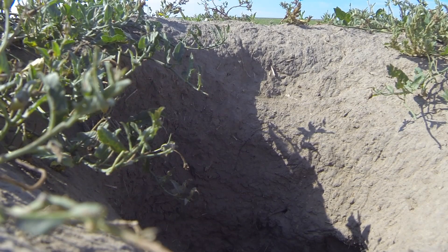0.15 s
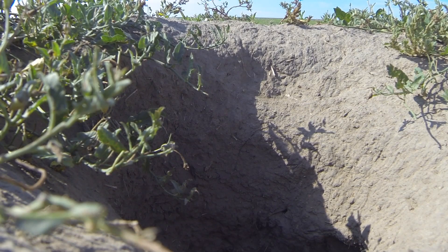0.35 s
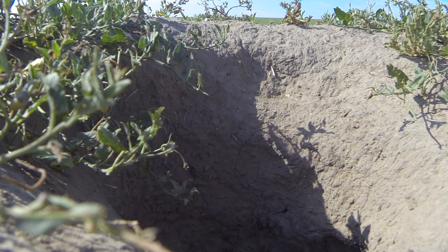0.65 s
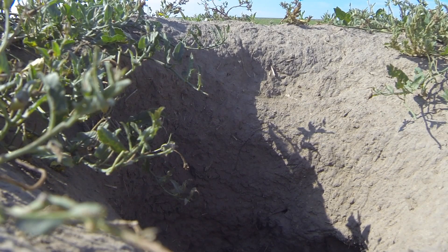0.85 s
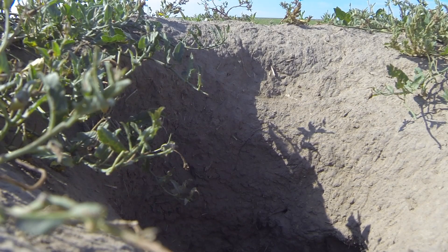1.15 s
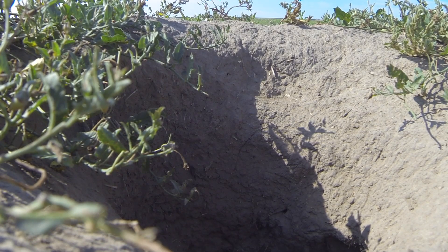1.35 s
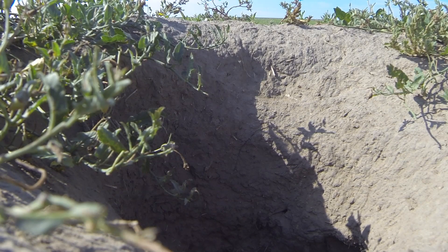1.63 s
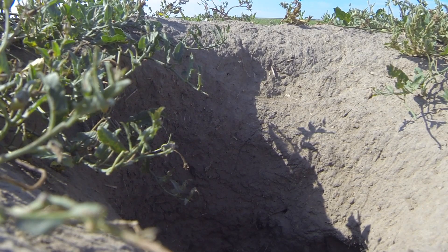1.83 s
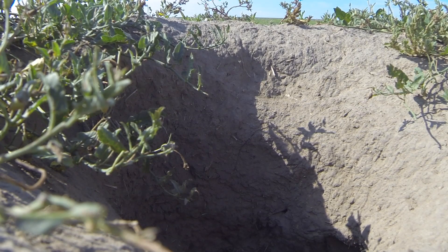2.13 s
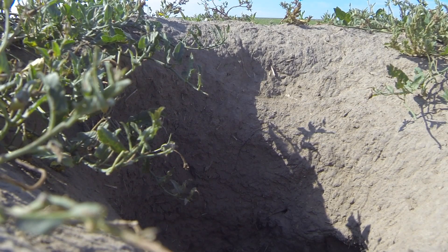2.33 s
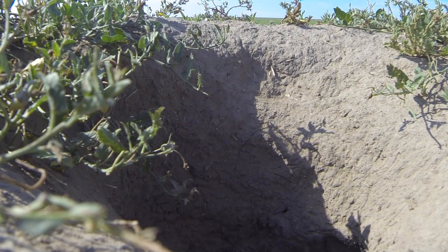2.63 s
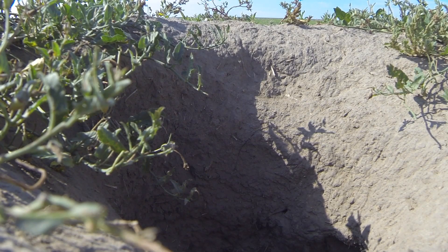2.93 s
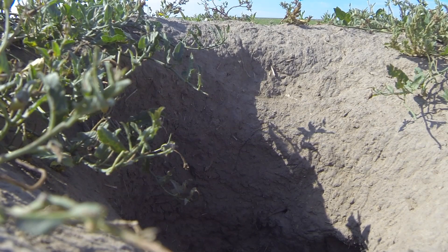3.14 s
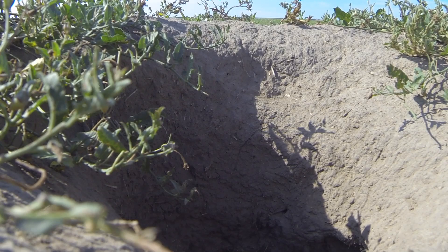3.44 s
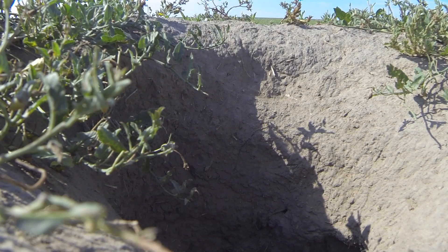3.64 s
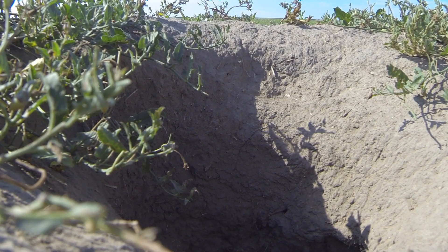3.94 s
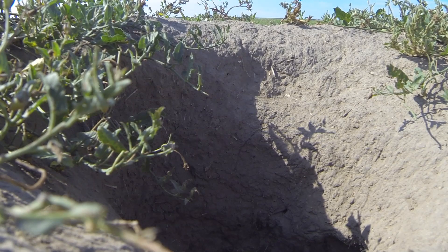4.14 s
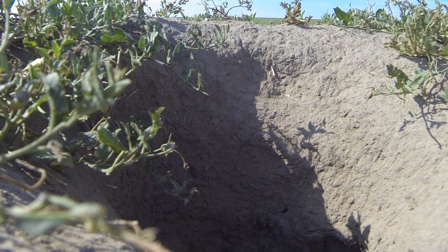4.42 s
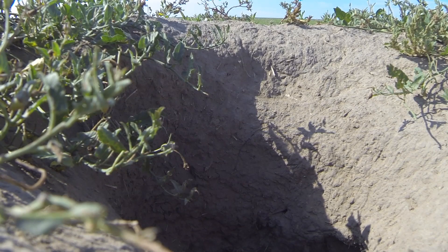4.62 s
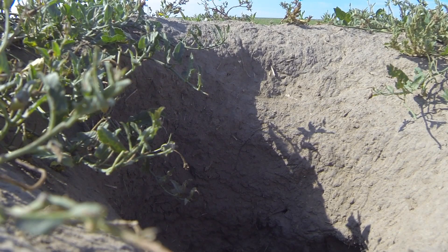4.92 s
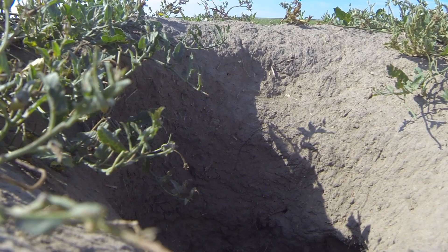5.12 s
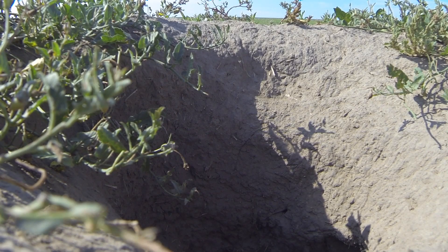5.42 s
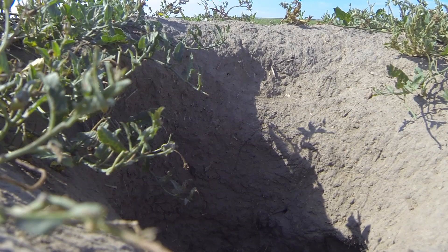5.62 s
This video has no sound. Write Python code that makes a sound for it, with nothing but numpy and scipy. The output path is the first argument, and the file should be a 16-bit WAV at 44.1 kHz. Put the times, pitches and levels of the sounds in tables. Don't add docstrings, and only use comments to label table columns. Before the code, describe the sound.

Close, piercing rodent yips repeat about every half second, each ending in a smack and a wheezy grunting in-breath, in quiet breezy open grassland.

```python
import sys
import numpy as np
from scipy import signal
from scipy.fft import rfft, irfft, next_fast_len
from scipy.io import wavfile
from scipy.ndimage import uniform_filter1d, map_coordinates

SR = 44100
rng = np.random.default_rng(int(sys.argv[2]) if len(sys.argv) > 2 else 0)


def to_wav(sig):
    pcm = np.clip(np.atleast_2d(sig), -1, 1) * 32767
    pcm = np.round(pcm).astype(np.int16)
    wavfile.write(sys.argv[1], SR, pcm.T)


def invert_db(level):
    return 10 ** (np.asarray(level, dtype=float) / 20)


N = 254456
TIME = np.arange(N) / SR


def unit(x):
    return x / np.sqrt(np.mean(x ** 2) + 1e-20)


def along(points, hz):
    f, v = np.transpose(points)
    return np.interp(np.log(hz + 1), np.log(f + 1), v)


def wobble(rate, count=N):
    knots = rng.standard_normal(int(count * rate / SR) + 4)
    return map_coordinates(knots, [np.arange(count) * rate / SR])


def filtered(x, response):
    m = next_fast_len(len(x) + 8192)
    return irfft(rfft(x, m) * response(np.fft.rfftfreq(m, 1 / SR)), m)[:len(x)]


def causal(spectrum):
    cepstrum = irfft(np.log(invert_db(along(spectrum, np.fft.rfftfreq(2048, 1 / SR)))))
    cepstrum[1:1024] *= 2
    cepstrum[1025:] = 0
    return irfft(np.exp(rfft(cepstrum)))


def modes(table):
    return lambda f: sum(invert_db(db) * (1j * f * w / (c * c - f * f + 1j * f * w)) ** 2 for c, w, db in table)


def turn(hz):
    return 2 * np.pi * np.cumsum(hz) / SR


def tone(hz):
    return np.sqrt(2) * np.sin(turn(hz))


def call(rows, tail=0.0074):
    s, *cols = np.transpose(rows)
    t = np.arange(s[0], s[-1] + tail, 1 / SR)
    gate = np.clip((t - s[0]) / .001, 0, 1) * np.clip((s[-1] + .002 - t) / .002, 0, 1)
    return round(s[0] * SR), t - s[0], [np.interp(t, s, c) for c in cols], gate


def add(out, start, x):
    out[start:start + len(x)] += x[:len(out) - start]


def bursts(events, response, rise, t60, gain_db):
    t, out = np.arange(3000) / SR, np.zeros(N)
    envelope = invert_db(-60 * t / t60) * (1 - np.exp(-t / rise)) ** 2
    for s, db in events:
        puff = filtered(envelope * rng.standard_normal(len(t)), response)
        add(out, round(s * SR), invert_db(db + gain_db) * puff / np.max(np.abs(puff)))
    return out


def rush(spectrum, patchy_db):
    z = signal.stft(rng.standard_normal(N), nperseg=512)[2]
    field = uniform_filter1d(rng.standard_normal(z.shape), size=6, axis=0)
    field = uniform_filter1d(field, size=12, axis=1)
    x = signal.istft(z * invert_db(patchy_db * unit(field)), nperseg=512)[1][:N]
    return filtered(x, lambda hz: invert_db(along(spectrum, hz)))


def breeze():
    # t/s, level/dB
    wind = [
        (0.0, -50),
        (2.54, -53),
        (2.84, -57),
        (3.49, -55),
        (5.16, -55.5),
        (5.37, -55),
        (5.77, -56.5),
    ]
    # f/Hz, level/dB per Hz
    buffeting = [(13, -43.5), (22, -6.5), (38, 3), (81, -1.5), (183, -13.5), (216, -16.5), (300, -30),
                 (390, -51), (660, -120)]
    # f/Hz, level/dB per Hz
    grass = [(120, -27.5), (200, 2), (395, -6), (591, -7.5), (645, -8.5), (1210, -16.5), (2040, -24),
             (8110, -41), (10000, -41.5), (13000, -49)]
    # t/s, peak level/dB
    brushes = [
        (0.118, -67),
        (0.292, -52),
        (0.46, -51),
        (0.841, -52.5),
        (1.184, -46),
        (1.439, -51),
    ]
    s, rumble_db = np.transpose(wind)
    grass_db = -67 + .5 * (rumble_db - rumble_db.mean())
    rumble_gain = invert_db(np.interp(TIME, s, rumble_db) + 6.0 + 0.33 * wobble(1.9))
    rumble = rumble_gain * unit(rush(buffeting, patchy_db=0.72))
    hiss = invert_db(-51) * unit(rush(grass + [(13100, -66)], patchy_db=.6))
    low = filtered(hiss, lambda hz: 1 / (1 + (hz / 2500) ** 2))
    gusts = invert_db(np.interp(TIME, s, grass_db) + 60 + .8 * wobble(8))
    leaves = bursts(brushes, modes([(600, 500, 0), (900, 600, -3)]), .002, .07, 3)
    return rumble + hiss - low + gusts * low + leaves


def whine():
    frame = (60 * TIME) % 1
    fuzz = unit(filtered(rng.standard_normal(N), lambda f: np.exp(-(f / 160) ** 2)))
    return invert_db(-83.5 - 9 * frame) * (1.2 + fuzz) * tone(10100 + 250 * (frame - .5) + 80 * wobble(30))


def swells(events, brisk=1):
    rise_db_per_s, fade_db_per_s = 300, 150
    slopes = [db + brisk * np.minimum(rise_db_per_s * (TIME - s), fade_db_per_s * (s - TIME)) for s, db in events]
    return invert_db(np.max(slopes, axis=0))


def insects():
    # t/s, peak level/dB
    ticks = [
        (0.745, -71.5),
        (0.805, -67),
        (0.9406, -64.5),
        (0.994, -65),
        (1.0189, -73),
        (1.0728, -66),
        (1.0997, -68),
        (1.1295, -70),
        (1.1745, -66),
        (1.202, -70),
    ]
    # t/s, peak level/dB
    near_swells = [(2.02, -75), (2.12, -75), (2.23, -71), (2.35, -74), (2.47, -76), (2.58, -70), (2.7, -67),
                   (2.82, -67.5), (2.93, -71), (3.01, -64), (3.16, -63), (3.32, -66), (3.49, -66),
                   (3.68, -66), (3.78, -69.5), (3.9, -74), (4.02, -76.5), (4.21, -66), (4.3, -76),
                   (4.55, -69), (4.65, -70.5), (4.74, -69), (4.83, -76), (5.05, -68.5), (5.14, -67.5),
                   (5.22, -71.5), (5.31, -65.5), (5.42, -78)]
    # t/s, peak level/dB
    second_swells = [
        (4.21, -80),
        (4.28, -79),
        (4.83, -74.5),
        (4.89, -76),
        (4.95, -78),
    ]
    # t/s, wing beat f/Hz, level/dB
    fly_path = [
        (3.12, 172.5, -70),
        (3.232, 153.6, -57),
        (3.314, 154.4, -57.5),
        (3.364, 169, -54),
        (3.419, 169.3, -66),
    ]
    roughness = unit(filtered(rng.standard_normal(N), lambda f: 1 / (1 + (f / 55) ** 3)))
    scrape = unit(.7 + roughness)
    first = swells(near_swells) * tone(14900 - 37 * TIME)
    second = swells(second_swells, brisk=2) * tone(15190 + 0 * TIME)
    s, hz, db = np.transpose(fly_path)
    fly = invert_db(np.interp(TIME, s, db, left=-130, right=-130)) * tone(np.interp(TIME, s, hz))
    grasshopper = bursts(ticks, modes([(11600, 1300, 0)]), .0003, .007, 0)
    return scrape * (first + second) + fly + grasshopper


def bark_rows(s, top_hz, top_s, give_s, slack_s):
    extra_hz = top_hz - 1972.6
    length = .0535 + 6.5e-5 * extra_hz
    sag_hz_per_s, shut_s = 5500, .008
    return [(s, 1610), (s + .0027, 1740), (s + .0072, 1880), (s + top_s, top_hz),
            (s + give_s, top_hz - sag_hz_per_s * (give_s - top_s)),
            (s + slack_s, 1750 + .4 * extra_hz),
            (s + max(length - shut_s, slack_s + 0.0013), 1680), (s + length, 1570)]


def barks():
    # start t/s, top f/Hz, top after t/s, gives way after t/s, slack after t/s
    bark_table = [
        (1.55, 2030, .0095, .0205, .031),
        (2.091, 1975, .020, .040, .045),
        (2.9295, 2035, .0095, .0185, .031),
        (3.5185, 1995, .016, .029, .036),
        (4.097, 1945, .017, .026, .0315),
        (4.5835, 1970, .019, .0265, .0345),
        (5.307, 1975, .016, .040, .047),
    ]
    flutters = [515, 610, 470, 520, 630, 560, 605]
    # f/Hz, level/dB
    throat_curve = [(150, -28.5), (300, -17), (700, -11.5), (1050, -18.5), (1350, -30.5), (2000, 1),
                    (2600, -3), (3700, -5.5), (4500, -5.5), (5300, -26.5), (7600, -21), (8600, -49),
                    (10000, -34.5), (14500, -78)]
    # f/Hz, level/dB
    effort = [(1560, -53), (1660, -32), (1700, -25), (1750, -22), (1860, -17.5), (1950, -13.5), (2040, -10)]
    # f/Hz, level/dB
    octave_curve = [(3300, 0), (3450, 2), (3700, 2.5), (3900, -2), (4080, -11.5)]
    # t/s, peak level/dB
    smacks = [
        (1.609, -29),
        (2.15, -25),
        (2.991, -23.5),
        (3.579, -32),
        (4.155, -22.5),
        (4.64, -25.5),
        (5.369, -28),
    ]
    # f/Hz, width/Hz, level/dB
    lips = [(720, 800, 3.5), (1779.6, 430, -2), (3500, 1500, -7.5)]
    out, throat = np.zeros(N), causal(throat_curve)
    for bark, flutter_hz in zip(bark_table, flutters):
        rows = bark_rows(*bark)
        start, age, (hz,), gate = call(rows)
        n = len(age)
        hz = hz * (1 + .008 * wobble(220, count=n))

        crack = np.exp(-((age - bark[2]) / .0018) ** 2)
        db = along(effort, hz)
        octave_db = along(octave_curve, 2 * hz) - 9 * crack
        octave_db += 7 * np.exp(-age / .009)
        hz, db = hz + 35 * crack, db - 9 / 4 * crack

        strain, limp = np.clip((hz - 1910) / 90, 0, 1), np.clip((1790 - hz) / 120, 0, 1)
        flutter_db = -22 + 7.5 * strain + 14 * limp + 4 * wobble(200, count=n)
        weak = np.minimum(np.max(db) - db, 25) * (age > .01)

        closing = np.clip(1 - (rows[-1][0] - rows[0][0] - age) / .007, 0, 1)
        hz = hz * (1 - .14 * closing)
        db = db + 5 * np.sin(np.pi * closing)
        phase = turn(hz * (1 + .004 * (1 + weak / 5) * wobble(600, count=n)))
        slow_hz = flutter_hz * (1 + .1 * wobble(150, count=n))
        slow = turn(slow_hz)

        def shake(depth_db):
            return invert_db(depth_db * wobble(520, count=n))

        rasp_db = .7 + np.minimum(.25 * weak, 2.8)
        note = shake(rasp_db) * np.cos(phase)
        note += invert_db(octave_db) * shake(rasp_db) * np.cos(2 * phase - 2 * np.exp(-age / .015))
        for k in range(3, 8):
            blur = .055 * k * k * wobble(900, count=n)
            note += invert_db(along(throat_curve, k * hz)) * shake(3.8) * np.cos(k * phase + blur)
        for k in range(6):
            for side in (1, -1)[:1 + (k > 0)]:
                colour_db = along(throat_curve, k * hz + side * slow_hz) - along(throat_curve, hz + slow_hz)
                line_db = flutter_db + colour_db - 3 * (k > 1) - 4 * (k > 2)
                note += invert_db(line_db) * shake(3) * np.cos(k * phase + side * slow)

        breath_gain = invert_db(db - 10.5 + .4 * weak + 6 * closing) * gate
        breath = breath_gain * (2 + np.cos(phase)) * rng.standard_normal(n)
        breath = signal.fftconvolve(breath, throat)[:n]
        chest = invert_db(db - 15.5 + .5 * weak) * gate * (0.8 + np.cos(slow)) * rng.standard_normal(n)
        add(out, start, filtered(chest, modes([(487, 450, 4), (864, 290, -4.5)])))
        add(out, start, np.sqrt(2) * invert_db(db) * gate * note)
        add(out, start, filtered(breath, lambda f: 1 / (1 + 0.39 * (f > 4400))))

    leaks = [(bark[0] - .0028, -35) for bark in bark_table]
    leak = bursts(leaks, modes([(2000, 1200, 0), (3500, 1100, -2)]), .0007, .03, 0)
    smack = bursts(smacks, lambda f: modes(lips)(f) / (1 + (f / 5500) ** 4), .0008, .009, -4)
    return out + leak + smack


def in_breaths():
    # start t/s, length t/s, from f/Hz, to f/Hz, level/dB
    swoops = [
        (1.6847, 0.013, 1490, 820, -30),
        (1.715, .029, 1058, 691, -30),
        (2.218, 0.0078, 1330, 702, -29.5),
        (3.08, .032, 1400, 589, -33),
        (3.647, 0.0087, 1300, 665, -34.5),
        (4.243, .026, 1230, 615, -34),
        (4.715, 0.012, 1200, 682, -29),
        (5.437, 0.0095, 1160, 690, -31.5),
    ]
    # start t/s, length t/s, from f/Hz, to f/Hz, level/dB
    glides = [
        (1.697, 0.022, 1066, 1004, -31),
        (1.745, .014, 736, 590, -37.5),
        (2.222, 0.035, 1081, 590, -33.5),
        (3.651, 0.033, 1078, 615, -34.5),
        (4.726, .029, 1087, 620, -36.5),
        (5.447, 0.027, 997, 568, -35),
    ]
    # f/Hz, level/dB
    pipe = [(550, -3), (680, -5.5), (780, 1.5), (900, -5.5), (1050, -5), (1300, -16)]
    # start t/s, length t/s, f/Hz, first knock level/dB, swell level/dB
    grunts = [
        (1.736, 0.077, 235.6, -34, -35),
        (2.251, 0.055, 238.6, -35, -34.5),
        (3.109, 0.048, 232.4, -36, -33),
        (3.684, 0.074, 242, -37.5, -37.5),
        (4.262, 0.053, 240, -37.5, -37.5),
        (4.76, 0.032, 294, -40, -51),
        (5.468, 0.036, 260.6, -35, -33.5),
    ]
    # t/s, peak level/dB
    sniffs = [(1.6886, -45), (1.7225, -80), (2.2069, -50), (2.2233, -46.5), (3.0535, -53), (3.0654, -49.5),
              (3.0929, -49), (3.6511, -53), (3.6711, -50.5), (3.691, -57), (4.2532, -58), (4.7202, -45.5),
              (4.7471, -52.5), (5.4186, -49.5), (5.442, -42.5), (5.463, -48), (5.4764, -49),
              (5.4884, -51.5)]
    # f/Hz, width/Hz, level/dB
    nose = [(2565, 400, -17), (1564, 610, -18)]
    out, air = np.zeros(N), np.zeros(N)
    whistles = [(*w, .5) for w in swoops] + [(*w, 1.6) for w in glides]
    for s, length, from_hz, to_hz, db, bend in whistles:
        start, age, (done,), gate = call([(s, 0), (s + length, 1)])
        n = len(age)
        hz = from_hz + (to_hz - from_hz) * done ** bend
        db = db + along(pipe, hz) + 1.5 * wobble(150, count=n)
        rise_s = .0018 + .3 * length * (bend < 1)
        gate = gate * np.clip(age / rise_s, 0, 1) * np.clip((length - age) / .0018 + 1, 0, 1)
        phase = turn(hz * (1 + .012 * wobble(300, count=n)))
        second = invert_db(-26.5 - (hz - 780) / 25 + 4 * wobble(250, count=n)) * np.cos(2 * phase)
        third = invert_db(-33 - abs(hz - 850) / 20) * np.sin(3 * phase)
        add(out, start, np.sqrt(2) * invert_db(db) * gate * (np.sin(phase) + second + third))
        add(air, start, invert_db(db - 16) * gate * rng.standard_normal(n))

    knock_s, sharp, edge_db = .0075, 1.14, -16
    for s, length, hz, knock_db, swell_db in grunts:
        rows = [(s, sharp * hz, knock_db + edge_db),
                (s + knock_s, sharp * hz, knock_db),
                (s + .34 * length, hz, min(knock_db, swell_db) - 5),
                (s + .66 * length, hz, swell_db),
                (s + length, hz, swell_db + edge_db)]
        start, age, (hz, db), gate = call(rows)
        phase = turn(hz * (1 + 0.04 * wobble(177, count=len(age))))
        pulses = sum(invert_db(-9 * k - 160 * age * (k > 0)) * np.cos((k + 1) * phase - 1.13 * k) for k in range(5))
        add(out, start, np.sqrt(2) * invert_db(db) * gate * pulses)
        add(air, start, invert_db(db - 22) * gate * (1 + np.cos(phase)) ** 2 * rng.standard_normal(len(age)))
    return out + filtered(air, modes(nose)) + bursts(sniffs, modes(nose), 0.00096, 0.028, 0)


def aircraft():
    # t/s, f/Hz, level/dB
    drone = [(2.0, 43.24, -60), (2.03, 42.25, -50.5), (2.61, 45.06, -49.5), (2.65, 44.97, -55),
             (3.12, 44.63, -46), (3.25, 42.32, -59), (3.46, 42.7, -41), (3.94, 40.07, -41),
             (4.51, 39.78, -41), (5.03, 35.21, -42.5), (5.77, 36.27, -40)]
    s, hz, db = np.transpose(drone)
    phase = turn(np.interp(TIME, s, hz))
    level = np.interp(TIME, s, db, left=-80)
    fundamental = invert_db(0.46 * wobble(4)) * np.sin(phase)
    octave = invert_db(-25 + 3 * wobble(3.3)) * np.sin(2 * phase)
    return np.sqrt(2) * invert_db(level) * (fundamental + octave)


def neighbour():
    # t/s, f/Hz, level/dB, half length t/s
    chirp = (2.68, 1550, -62, .022)
    s, hz, db, half = chirp
    return invert_db(db) * np.exp(-((TIME - s) / half) ** 2) * np.sin(2 * np.pi * hz * TIME)


def burrow_echo(voice):
    t = np.arange(3000) / SR
    wall = invert_db(-60 * t / 0.036) * rng.standard_normal(len(t)) * (t > .002)
    return invert_db(-42) * signal.fftconvolve(voice, wall / np.linalg.norm(wall))[:N]


def duck(loud):
    depth_db, hold_s, release_s = 5.5, .02, .04
    over = np.sqrt(np.abs(uniform_filter1d(loud ** 2, size=200))) > invert_db(-24)
    t = np.arange(8000) / SR
    held = np.minimum(signal.fftconvolve(over, t < hold_s)[:N] / (.006 * SR), 1)
    fading = signal.fftconvolve(held, np.exp(-t / release_s) / (release_s * SR))[:N]
    return invert_db(-depth_db * np.maximum(held, 1.2 * fading))


def scene():
    voice = barks() + in_breaths()
    background = breeze() + aircraft() + insects() + whine() + neighbour()
    return (voice + burrow_echo(voice) + duck(voice) * background)[None]


def low_pass(x):
    return signal.sosfilt(signal.butter(12, 15350, fs=SR, output="sos"), x)


def record(dry):
    return low_pass(dry)


dry = scene()
out = record(dry)
to_wav(out)
```